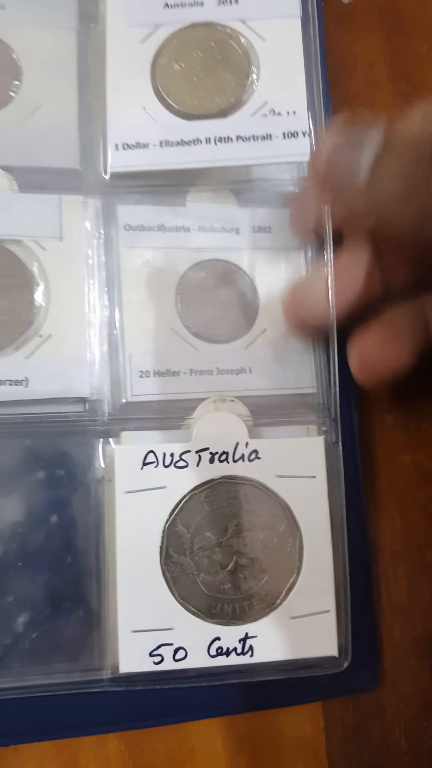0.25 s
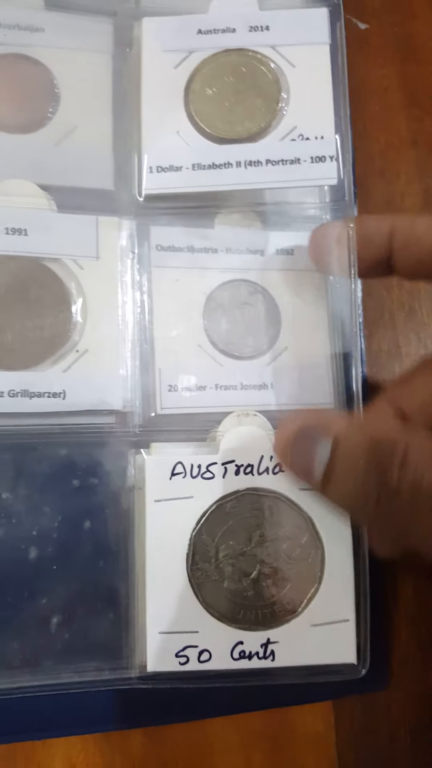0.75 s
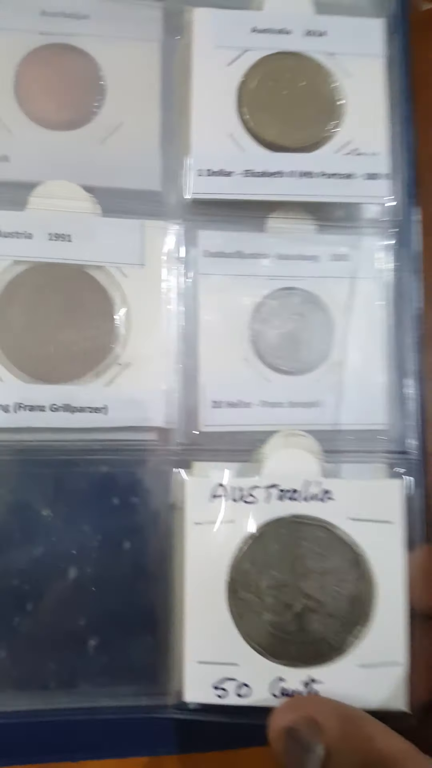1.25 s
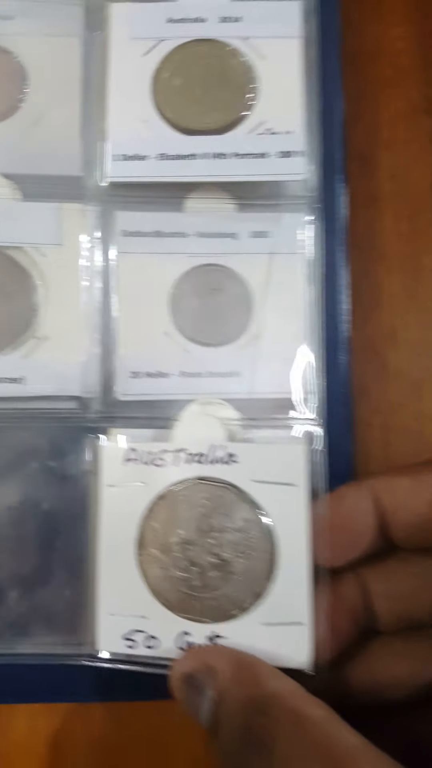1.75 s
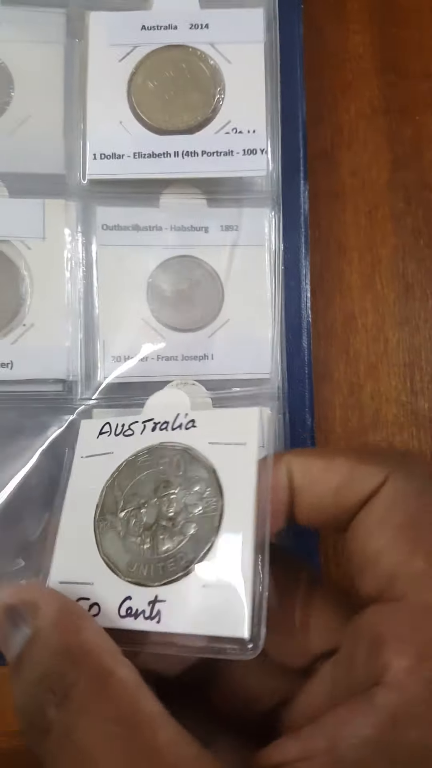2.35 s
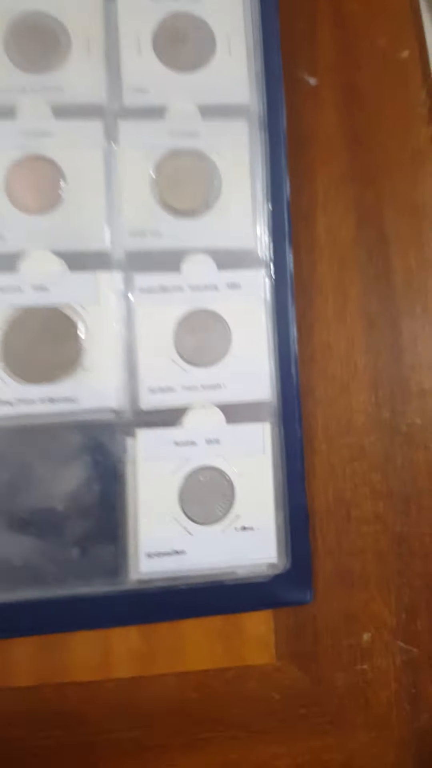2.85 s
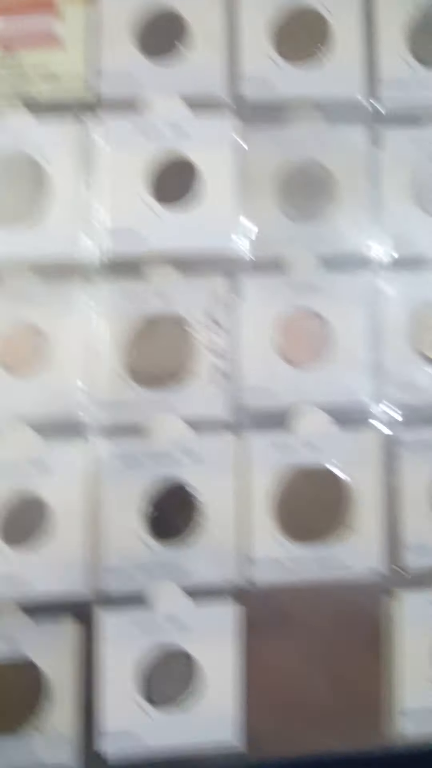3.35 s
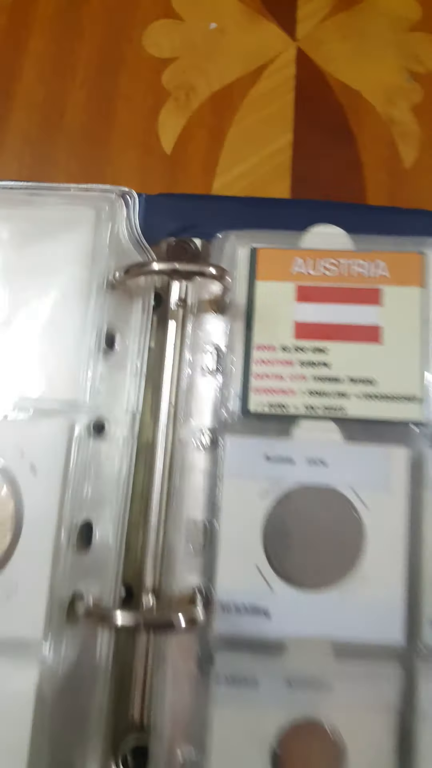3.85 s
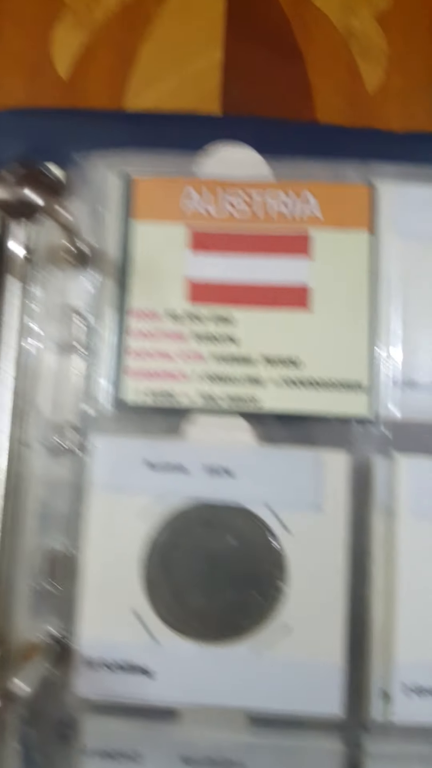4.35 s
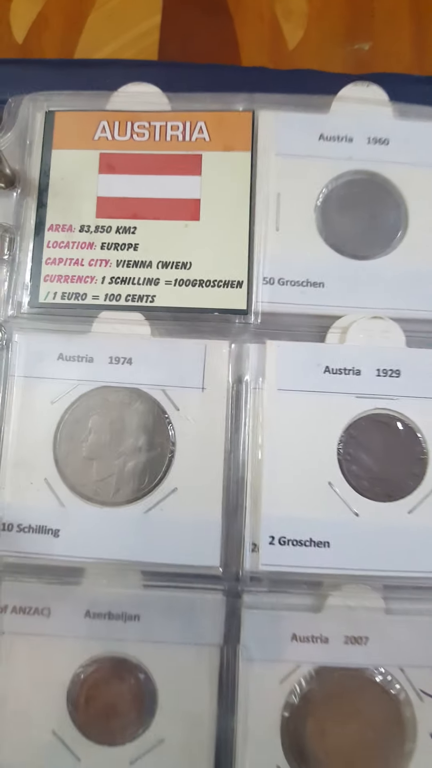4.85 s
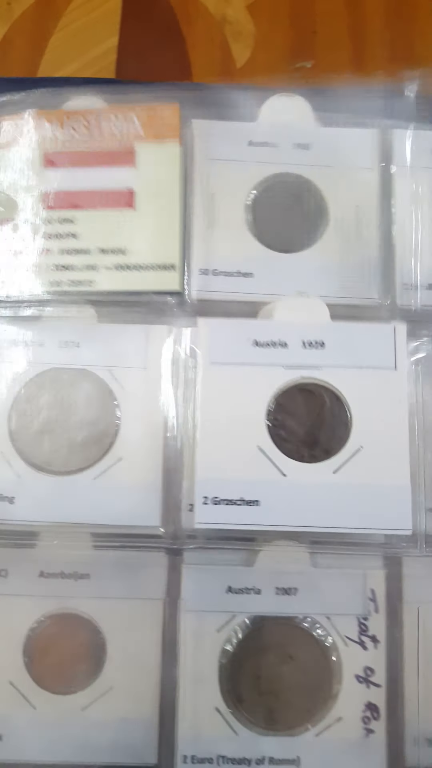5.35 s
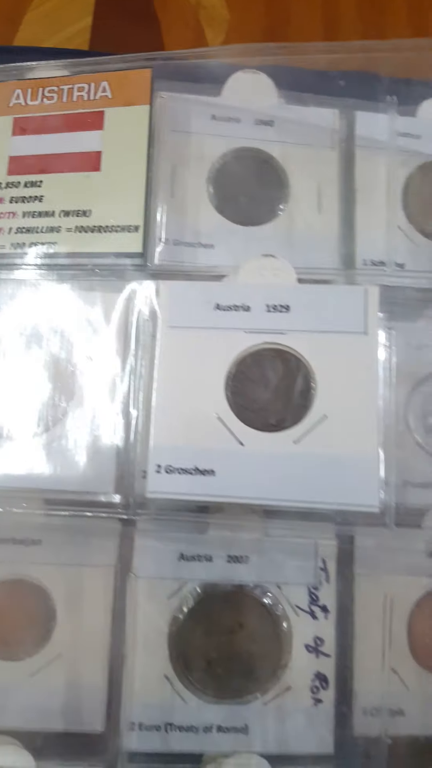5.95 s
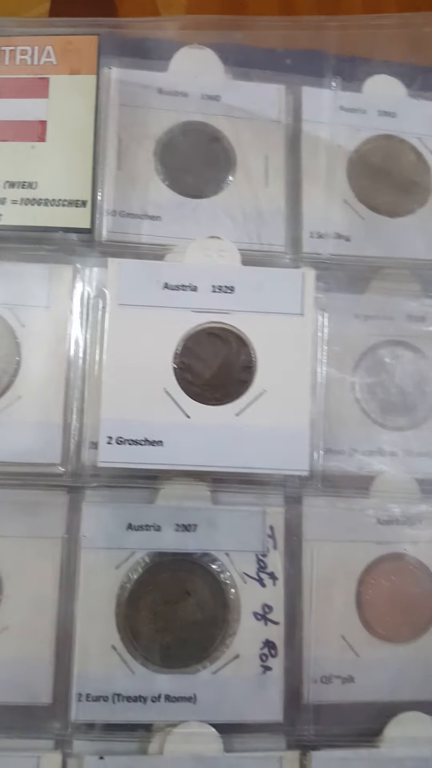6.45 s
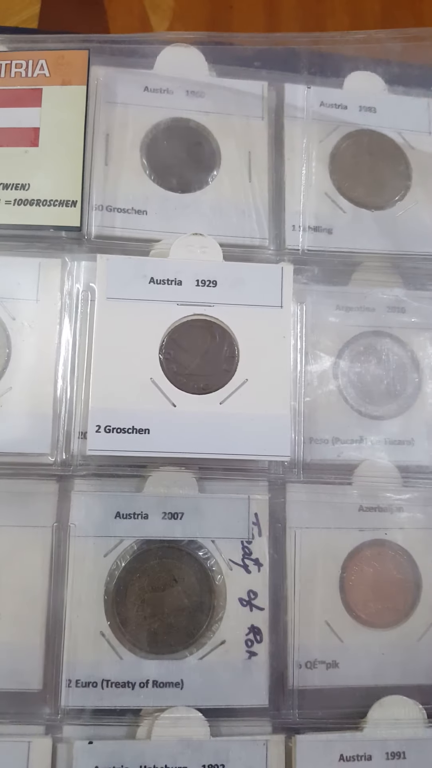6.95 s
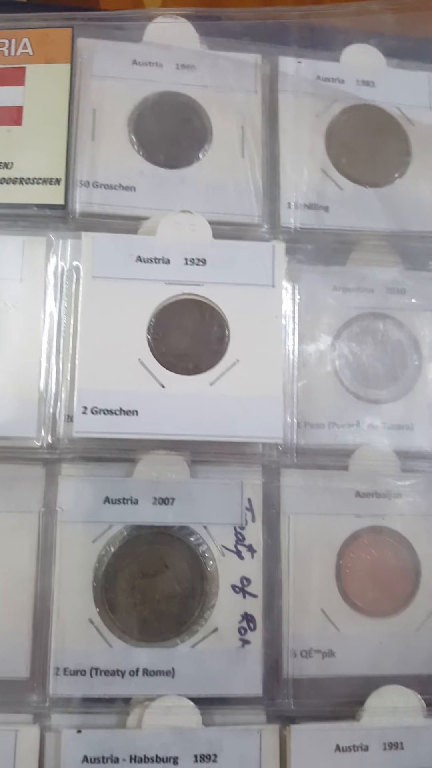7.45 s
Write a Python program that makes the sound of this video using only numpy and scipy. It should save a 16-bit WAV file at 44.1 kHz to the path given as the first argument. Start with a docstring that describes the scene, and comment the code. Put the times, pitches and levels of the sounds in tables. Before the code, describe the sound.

A hand turns plastic pocket pages with crinkles, a sharp slap and a burst of snaps, while a motor hums in a small room.

```python
"""In a small room, a hand slides along, lifts and turns the stiff plastic pocket pages of a ring binder
on a table. The plastic crackles under the fingers and snaps as it buckles, a page drops flat, and the
binder gives the table low shoves. Behind this are soft air noise, the hum of a mains-driven motor with
a thin whine, and a clock that ticks faintly once a second."""
import sys
import numpy as np
from scipy import signal
from scipy.fft import rfft, irfft
from scipy.io import wavfile
from scipy.ndimage import uniform_filter1d

SR = 44100
rng = np.random.default_rng(int(sys.argv[2]) if len(sys.argv) > 2 else 0)


def master(y):
    """Save y as 16-bit WAV."""
    cut = np.clip(np.atleast_2d(y).T, -1, 1)
    pcm = np.round(cut * 32767)  # scale
    wavfile.write(sys.argv[1], SR, pcm.astype(np.int16))


N = 339570

# Tone of the air noise, in pieces: (frequency [Hz], relative level [dB])
AIR_BASS = [(25, -19.5), (65, -19), (140, -13.5), (175, -5.5), (215, -3)]
AIR_AT_PAGE_EDGE = [(140, -31), (235, -1.5), (305, -4), (352, -15), (396, -5), (420, -10.5), (683, -22.5),
                    (919, -17.5), (1150, -24), (1360, -20.5), (1720, -29), (2320, -30.5), (4000, -39.5),
                    (5200, -53), (8800, -120)]
AIR_OVER_BINDER = [(140, -29), (235, 0), (274, -4.5), (309, -4), (369, -15.5), (401, -7), (425, -20),
                   (502, -13.5), (652, -20.5), (779, -16), (856, -21), (1480, -23.5), (4000, -39),
                   (5200, -51), (8800, -120)]
AIR_TREBLE = [(5300, -43.5), (5900, -40), (6600, -45.5), (8300, -44.5), (9500, -47.5), (10800, -52.5),
              (13000, -45.5), (14000, -48), (15600, -46)]
# How alike the air sounds in both ears: (frequency [Hz], likeness [-1 to 1])
AIR_LIKENESS = [(60, 0.85), (130, 0.99), (290, 0.96), (640, 0.31), (1410, -0.19), (3100, -0.054),
                (6820, -0.097), (15000, 0.01)]
# Where the air noise leans; "pan" is always left minus right: (frequency [Hz], pan [dB])
AIR_PAN = [(200, 0.5), (380, -1.5), (700, 3), (1300, 1), (4400, -0.5), (11000, 2), (13000, 0.5),
           (14000, -0.5)]
# The motor's lowest tone: (time [s], level [dB])
BUZZ_LEVELS = [(2.9, -59.5), (3.6, -61.8)]
# Its main hum, growing as the listener moves: (time [s], level [dB])
HUM_LEVELS = [(3.3, -42), (3.8, -40)]
# Tones of the hum: (multiple of the mains, level against the main hum [dB], pan [dB])
HUM_TONES = [(2, -36.5, 2.5), (4, 0, 1), (6, -26.5, -5.5), (8, -30, -3), (16, -31.5, -4.5), (18, -35.5, -1),
             (22, -35.5, -1)]
# Tones of the whine: (frequency [Hz], relative level [dB])
WHINE_TONES = [(5810, -4), (5910, 0), (6110, -8), (6212, -10), (6315, -7), (6412, -7), (8312, -10)]
# Brief swells of the whine: (time [s], boost [dB])
WHINE_BOOSTS = [(1.2, 3.9), (4.4, 7.5)]
# Pitches at which the clock and a plastic sheet ring: (frequency [Hz], width [Hz], relative level [dB])
CLOCK_MODES = [(1500, 1000, -2.5), (2700, 900, -0.5), (4200, 1700, -8.5)]
SHEET_MODES = [(275, 132, -2.5), (632, 270, -0.5), (912, 377, 4), (1500, 710, 1.5), (2090, 790, 1.5),
               (3154, 460, 4), (3900, 810, 0.5), (5970, 1260, -3), (8020, 1260, -5.5), (11500, 1400, -11.5),
               (14800, 4100, -17.5)]
# How long the room echoes: (frequency [Hz], time to fade by 60 dB [s])
ROOM_FADE = [(150, 0.7), (600, 0.25), (2000, 0.34), (5000, 0.31), (12000, 0.31)]
# The page turn and slap ring on in table and room; later crackles sound drier: (time [s], gain [dB])
PAGE_ECHO = [(3.5, -5.5), (4.7, -11)]
# Page and binder shoving the table: (peak time [s], level [dB])
TABLE_SHOVES = [(2.804, -38), (2.9, -34), (2.945, -43), (3.036, -49), (3.115, -43), (3.22, -43.5),
                (3.268, -32.5), (5.23, -57), (5.378, -53), (5.435, -48), (5.548, -46), (5.78, -62)]
# A bent sheet is stiffer and rings higher: (time [s], tilt [dB per octave])
BEND_TILT = [(3.5, -0.5), (4.7, 18)]
# A lifted page knocks less than one on the stack: (time [s], knock gain [dB])
LIFT_KNOCK = [(3.5, 3), (4.7, -13)]
# The right ear hears snaps and slaps later: (time [s], delay [ms])
RIGHT_DELAY = [(3.3, 0.03), (4.7, .13)]
# Plastic has five bands, low to high: knock, body, middle, crackle, treble, each set against the crackle.
# How knock, body and middle follow a buckle's depth: (level at depth 0 [dB], slope [dB per dB])
RUB_TONE = [(3.5, 0.56), (0.2, 1.12), (0.47, 0.63)]
SNAP_TONE = [(3.5, 0.8968), (-0.1, 1.1167), (2, 0.47)]
# Fingers stroking plastic: (start [s], length [s], crackle [dB], depth [dB], treble [dB], pan [dB])
STROKES = [(.58, 0.59, -69, -5, -1.5, -5), (2.3, 0.57, -73, -2, -1.5, 2), (2.71, 0.34, -67, 4, -2.5, 1),
           (2.938, 0.051, -58, -1, -13, 1), (2.993, 0.097, -58, 9.5, -6.5, 3), (3.068, .1, -58, 11, -5, 4),
           (3.161, 0.095, -62.5, 11, 0.5, 3), (4.896, 0.26, -70, -1.5, 4.5, 2),
           (5.053, 0.24, -54, -4, -2, -3), (5.268, 0.11, -58, 8, -4, 2), (5.331, 0.1, -54.5, 7, 4.5, -3),
           (5.427, 0.09, -54, -9, -8, -6), (5.485, 0.12, -66.5, 0, -4, -2)]
# Buckles snapping through: (time [s], crackle [dB], depth [dB], treble [dB], pan [dB])
BUCKLES = [(0.0603, -71, -2, 11, 5), (0.0955, -69, 3, 6, 1), (0.32, -67, 5, 5, -3), (0.43, -67, 0, 5, 0),
           (1.9393, -62.5, -3, 5, 2), (2.3653, -69, -2, 10, 13), (2.4853, -60, -5, 0, -3),
           (2.571, -60, 0, 3, 4), (2.61, -53, -8, -6, 6), (2.6378, -60, 6, 2, 2), (2.667, -62, -4, -6, -1),
           (2.7662, -55.5, 10.5, -1, 3), (2.9402, -62, 21, -12, 6), (2.9617, -53, 5, -16, 2),
           (3.0282, -49.5, 10, 2.5, 2), (3.0413, -51.5, 13, -1, 4), (3.1066, -53.5, 15.5, -9, 5),
           (3.1307, -45.5, -17, 2, 3), (3.1372, -37, 6, -7.5, 3), (3.1399, -42, 6, -9, 13),
           (3.1956, -51.5, 7, 0, 5), (3.208, -53.5, 22, -14, 2), (3.2145, -55, 6, -7, 6),
           (3.223, -59, 12, -3, 5), (4.9454, -60, 4, 1, 4), (4.9681, -47, -7, 1, 6),
           (5.0271, -53, -7, 0, 7), (5.038, -36, -9, -6.5, 6.5), (5.0467, -49, -8, 2, 1),
           (5.061, -26.5, -4.5, -4, 2.5), (5.085, -47, -12, 3, 5), (5.0963, -34, -9, -4, 3),
           (5.1054, -34.5, -4, 4.5, 12.5), (5.1092, -29, -8, -4, -3), (5.1134, -33, -12, 0.5, 7),
           (5.133, -33.5, -4, -2, 2), (5.1537, -46, -1, -7, 7), (5.171, -41.5, -2, -13, 6),
           (5.188, -43, -5, 0, 10), (5.1997, -29.5, -4, -6, -6), (5.208, -28, -2.5, -10, 7),
           (5.2139, -20, -16, -14, 6), (5.2181, -39.5, -11, -1, 25), (5.2296, -28, -1.5, -9, -1),
           (5.271, -26.5, -12, -8.5, 6), (5.3183, -36.5, -14, -4.5, 5), (5.3255, -44, 6, 0, 4),
           (5.345, -43, 4, -8, 10), (5.356, -51, 12, -6, 6), (5.3656, -40, -8, 1, -2),
           (5.369, -38, -13, -1, 10), (5.3745, -37.5, -3, -7, 21), (5.379, -39, 14.5, -2, 6),
           (5.3833, -40, 12.5, -5, -8), (5.396, -30, 6.5, -6, 8), (5.3996, -52, 23.5, 4, 10),
           (5.4104, -44, 14, -10, 9), (5.415, -31, 9, -5.5, 0), (5.4178, -32, 4, -1.5, 4),
           (5.4533, -34, -18, -7.5, 6.5), (5.4686, -39, -15, -7, 11), (5.4727, -45, -3, -7, 22),
           (5.5333, -43.5, -13, -11, 12.5), (5.972, -58.5, -3, -3, -11)]
# A page landing or tapping on the stack:
# (time [s], crackle [dB], knock [dB], body [dB], middle [dB], treble [dB], pan [dB], tilt [dB per octave])
PAGE_SLAPS = [(2.8108, -29, 11.5, 8, 7, -11, 3, -4), (3.2627, -14.5, -4.5, 5.5, -4.5, -8.5, 7, 3),
              (4.7919, -54.5, 11, 8, 7.5, 6, 6.5, 0.5), (5.545, -48.5, 14, 3, -3, -4, 6, -6)]


def gain_of(db):
    """Turns decibels into a factor to multiply by."""
    return 10 ** (np.asarray(db) / 20)


def panned(pan_db):
    """Left and right gains that lie pan_db apart."""
    return gain_of([[pan_db / 2], [-pan_db / 2]])


def unit_level(x):
    """Scales a signal to an average (rms) size of 1."""
    return x / np.sqrt(np.mean(x ** 2) + 1e-20)


def at_time(table, t):
    """Reads a table between its times."""
    return np.interp(t, *np.transpose(table))


def at_pitch(table, hz):
    """Reads a table between its frequencies, on an octave scale."""
    f, value = np.transpose(table)
    return np.interp(np.log(hz + 1), np.log(f + 1), value)


def drift(fastest_hz, t):
    """A slow random wobble of average size 1."""
    rates, coarse = np.geomspace(fastest_hz / 20, fastest_hz, 20), np.linspace(0, t[-1], 1000)
    waves = np.sin(2 * np.pi * (rates[:, None] * coarse + rng.random((20, 1)))) / np.sqrt(rates[:, None])
    return np.interp(t, coarse, unit_level(waves.sum(0)))


def ringing(modes, hz):
    """How a tapped object answers at each frequency: a sum of fading tones."""
    return sum((-1) ** k * gain_of(db) * 1j * hz * abs(width) / (f ** 2 - hz ** 2 + 1j * hz * abs(width))
               for k, (f, width, db) in enumerate(modes))


def air(level_db=-50.5, move_at_s=3.1, move_length_s=.6):
    """Fan and room noise; its tone shifts as the listener moves over the table."""
    frames, hz = N // 512 + 5, np.fft.rfftfreq(2048, 1 / SR)
    t = np.arange(frames) * 512 / SR
    a, b, c, d, flicker = rng.standard_normal((frames, 1025, 5)).T
    flicker = unit_level(uniform_filter1d(uniform_filter1d(flicker, 16, 0), 8, 1))
    left, other = a + 1j * b, c + 1j * d
    alike = np.clip(at_pitch(AIR_LIKENESS, hz), -1, 1)[:, None]
    noise = np.array([left, alike * left + np.sqrt(1 - alike ** 2) * other])
    noise /= np.sqrt((1 + alike) / 2)  # unlike parts add up less than like ones
    noise *= gain_of(at_pitch(AIR_PAN, hz)[:, None] / 2 * np.array([1, -1])[:, None, None])
    edge_db, binder_db = (at_pitch(AIR_BASS + list(mids)[1:-2] + AIR_TREBLE, hz)[:, None]
                          for mids in (AIR_AT_PAGE_EDGE, AIR_OVER_BINDER))
    moved = np.clip((t - move_at_s) / move_length_s + .5, 0, 1)
    noise *= gain_of(edge_db * (1 - moved) + binder_db * moved + .54 * flicker + .13 * drift(5.5, t))
    return gain_of(level_db) * unit_level(signal.istft(noise, nperseg=2048, noverlap=1536)[1][:, :N])


def motor_hum(mains_hz=50.02):
    """A motor shakes at the mains frequency and at multiples of it."""
    t = np.arange(N) / SR
    cycles = np.cumsum(mains_hz * (1 + .000978 * drift(1.493, t))) / SR
    out = gain_of(at_time(BUZZ_LEVELS, t)) * np.sin(2 * np.pi * cycles) * panned(-1)
    for multiple, db, pan_db in HUM_TONES:
        level = gain_of(at_time(HUM_LEVELS, t) + db + .17 * drift(13, t))
        out += level * np.sin(2 * np.pi * (multiple * cycles + rng.random())) * panned(pan_db)
    return np.sqrt(2) * out


def whine(swell_s=.14):
    """Thin wavering tones, most near 6 kHz, that slowly fade and swell twice."""
    t, out = np.arange(N) / SR, np.zeros((2, N))
    level_db = -89 - .28 * t + 2 * drift(2.5, t)
    level_db += sum(db * np.exp(-((t - s) / swell_s) ** 2) for s, db in WHINE_BOOSTS)
    for hz, db in WHINE_TONES:
        cycles = hz * t + .06 * drift(15, t) + rng.random() + [[0], [.2]]
        out += gain_of(level_db + db + 4.1 * drift(25, t)) * np.sin(2 * np.pi * cycles)
    return np.sqrt(2) * out


def clock(first_tick_s=.32, rattle_s=.06, hits_per_s=300):
    """Once a second the works of a far clock rattle for a moment."""
    since_tick = (np.arange(N) / SR - first_tick_s) % 1
    rattle = rng.standard_normal(N) * (rng.random(N) < hits_per_s / SR) * (since_tick < rattle_s)
    ring = irfft(ringing(CLOCK_MODES, np.fft.rfftfreq(1024, 1 / SR)))
    ticks = signal.oaconvolve(rattle, ring / np.linalg.norm(ring))[:N]
    return np.tile(gain_of(-43.5) * ticks, (2, 1))


def room_echo(sound, build_up_s=.014):
    """Many small echoes build up, then each pitch dies away at its own speed."""
    echoes = np.zeros((2, SR // 2))
    at = np.arange(120, SR // 2 - 10, 10) + rng.integers(0, 10, (2, (SR // 2 - 121) // 10))
    np.put_along_axis(echoes, at, rng.choice([-1., 1.], at.shape), 1)
    echoes *= np.clip(np.arange(SR // 2) / SR / build_up_s, 0, 1) ** 1.3
    hz, t, spectra = signal.stft(echoes, SR, nperseg=128)
    fade = gain_of(-60 * t / at_pitch(ROOM_FADE, hz)[:, None])
    tail = signal.istft(spectra * fade, SR, nperseg=128)[1]
    return signal.fftconvolve(sound.mean(0)[None], tail / np.linalg.norm(tail[0]), axes=1)[:, :N]


def shoves(rise_s=.027, fall_db_per_s=285):
    """Low, lumpy pushes travel through table and hand, nearly the same in both ears."""
    low_band = signal.butter(2, [58, 160], "band", fs=SR, output="sos")
    rumble = signal.sosfilt(low_band, rng.standard_normal((2, N)))
    rumble = unit_level(rumble[0] + .17 * rumble * [[1], [-1]])
    t, level = np.arange(N) / SR, np.zeros(N)
    for s, db in TABLE_SHOVES:
        rise = np.clip(1 + (t - s) / rise_s, 0, 1) ** 2
        level += rise * gain_of(db - fall_db_per_s * np.maximum(t - s, 0))
    return rumble * level * panned(2.6)


def sheet(hz, tilt_db):
    """The ringing of a plastic sheet, tilted around 1.1 kHz by its stiffness."""
    octaves = np.clip(np.log2(hz / 1100 + 1e-9), -.7, .4)
    return ringing(SHEET_MODES, hz) * gain_of(tilt_db * octaves)


def low_bands_db(tone, depth, s):
    """Knock, body and middle levels for a buckle of this depth at time s."""
    at_zero, slope = np.transpose(tone)
    return at_zero + slope * depth + [at_time(LIFT_KNOCK, s), 0, 0]


def mix_bands(spectrum, size, levels_db):
    """Splits a spectrum into the five bands of plastic and mixes them into one wave at these levels."""
    octaves = np.log2(np.fft.rfftfreq(size, 1 / SR) + 1)
    below = [np.clip((np.log2(hz) - octaves) / .3 + .5, 0, 1)
             for hz in (150, 700, 1700, 2800, 5000, 30000)]
    bands = [irfft(spectrum * (upper - lower), size) for lower, upper in zip(below, below[1:])]
    return sum(gain_of(db) * unit_level(band) for db, band in zip(levels_db, bands))


def finger_rubs(slips_per_s=6000):
    """Skin slips over plastic in many tiny jerks, a few larger, and each rings the sheet."""
    strength = gain_of(3 * np.minimum(rng.exponential(1, (2, N)), 5))
    slips = strength * (rng.random((2, N)) < slips_per_s / SR) * rng.choice([-1, 1], (2, N))
    slips = slips + .11 * slips[::-1]  # each ear hears a little of the other side
    out = np.zeros((2, N))
    for s, length, crackle_db, depth, treble_db, pan_db in STROKES:
        start, size = round(s * SR), 2 * round(length * SR / 2)
        span, hz = slice(start, start + size), np.fft.rfftfreq(size, 1 / SR)
        spectrum = rfft(slips[:, span]) * sheet(hz, at_time(BEND_TILT, s))
        rub = mix_bands(spectrum, size, (*low_bands_db(RUB_TONE, depth, s), 0, treble_db))
        arch = abs(np.sin(np.pi * np.linspace(0, 1, size) ** 1.18)) ** 1.25  # pointed, peaks a bit late
        out[:, span] += arch * rub * gain_of(crackle_db) * panned(pan_db)
    return out


def snaps_and_slaps(snap_jagged=.82, slap_jagged=.61, size=1024, lead=128):
    """Each is a sharp click plus a jagged burst that ring the sheet; a larger buckle takes longer."""
    hz, out = np.fft.rfftfreq(size, 1 / SR), np.zeros((2, N + size))
    ms = np.maximum(np.arange(size) - lead, 0) / SR * 1000
    events = [(*slap, slap_jagged) for slap in PAGE_SLAPS]
    for s, crackle_db, depth, treble_db, pan_db in BUCKLES:
        lows_db = low_bands_db(SNAP_TONE, depth, s)
        events.append((s, crackle_db, *lows_db, treble_db, pan_db, at_time(BEND_TILT, s), snap_jagged))
    for s, crackle_db, knock_db, body_db, middle_db, treble_db, pan_db, tilt_db, jaggedness in events:
        noise = rng.standard_normal((3, size))
        shared, own = noise[0], noise[1:]  # each ear also hears its own part of the sheet
        rise_ms = .55 + .32 * gain_of(crackle_db + body_db + 12.5)
        jagged = ms * np.exp(-ms / rise_ms) * (shared + .54 * own)
        click = np.sign(shared[0]) * (np.arange(size) == np.argmin(abs(ms - rise_ms)))
        burst = rfft(jaggedness * jagged / np.linalg.norm(jagged[0]) + click)
        burst[1] *= np.exp(-2j * np.pi * hz * at_time(RIGHT_DELAY, s) / 1000)
        snap = mix_bands(burst * sheet(hz, tilt_db), size, (knock_db, body_db, middle_db, 0, treble_db))
        snap *= np.sqrt(SR / 1000 / size)  # levels count as if all the energy fell within 1 ms
        start = round(s * SR) - lead
        out[:, start:start + size] += gain_of(crackle_db) * panned(pan_db) * snap
    return out[:, :N]


def scene():
    """The pages close by, the clock mostly as echo, and the steady sounds of the room."""
    pages, ticks = snaps_and_slaps() + finger_rubs(), clock()
    echo_gain = gain_of(at_time(PAGE_ECHO, np.arange(N) / SR))
    echoes = room_echo(echo_gain * pages + ticks)
    return pages + gain_of(-7) * ticks + echoes + shoves() + motor_hum() + whine() + air()


def record(dry, ceiling=.8, cutoff_hz=15750):
    """Rounds off the loudest peak, then cuts the very highest treble."""
    rounded = ceiling * np.tanh(dry / ceiling)
    low_pass = signal.firwin(511, cutoff_hz, window=("kaiser", 9), fs=SR)
    return signal.oaconvolve(rounded, low_pass[None], "same")


dry = scene()
out = record(dry)
master(out)
```